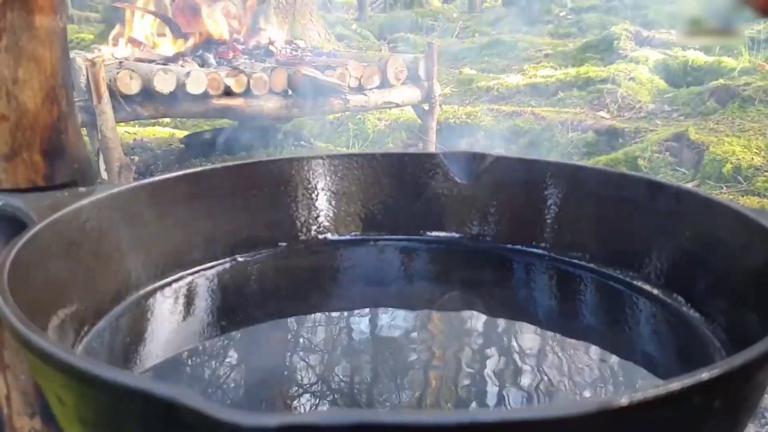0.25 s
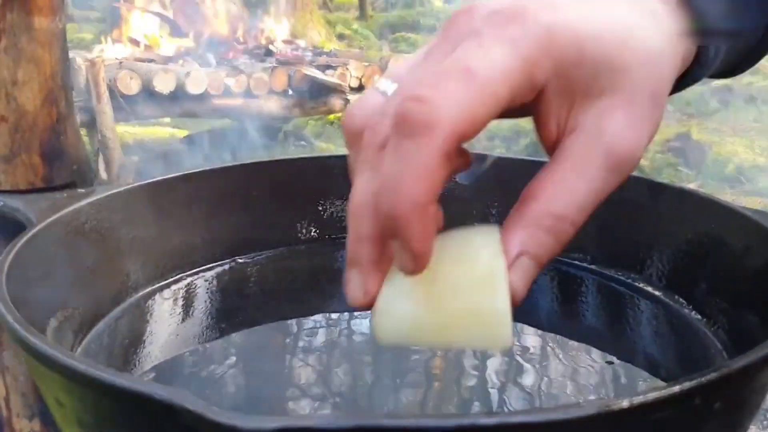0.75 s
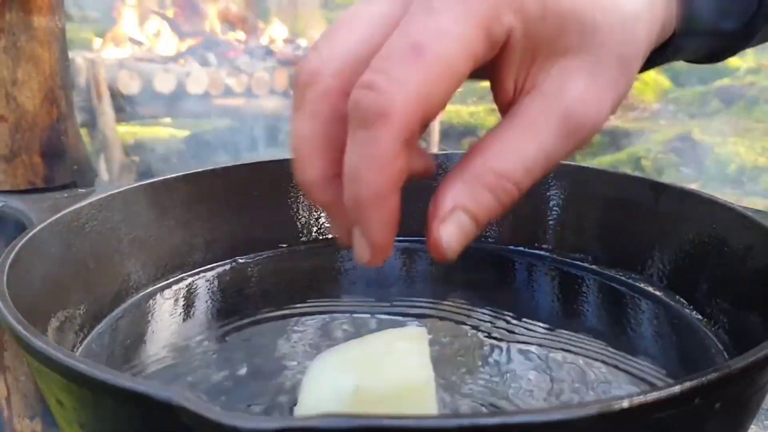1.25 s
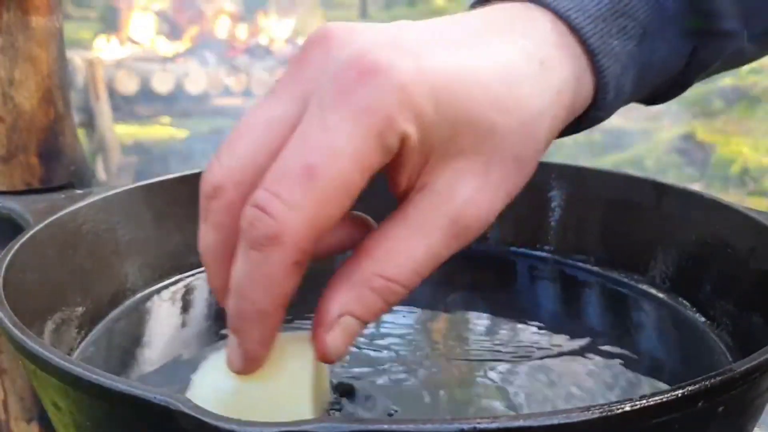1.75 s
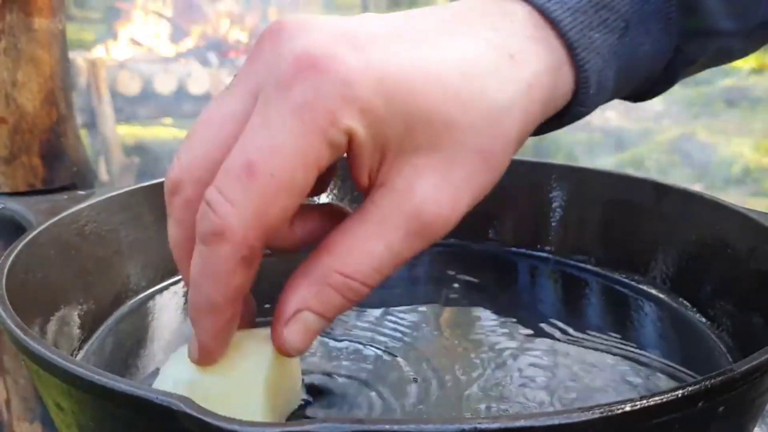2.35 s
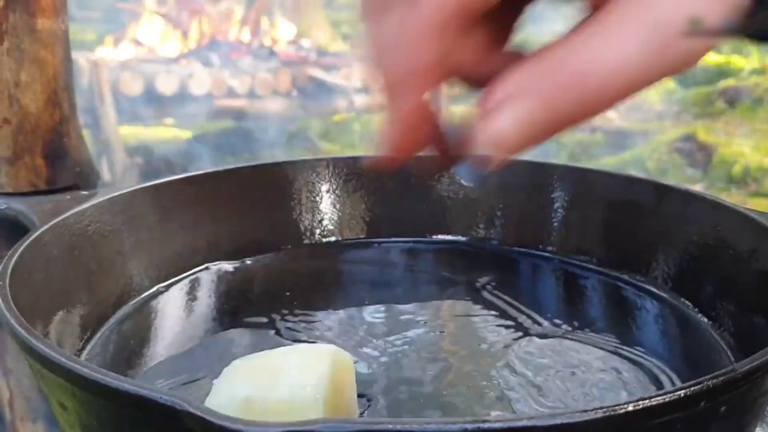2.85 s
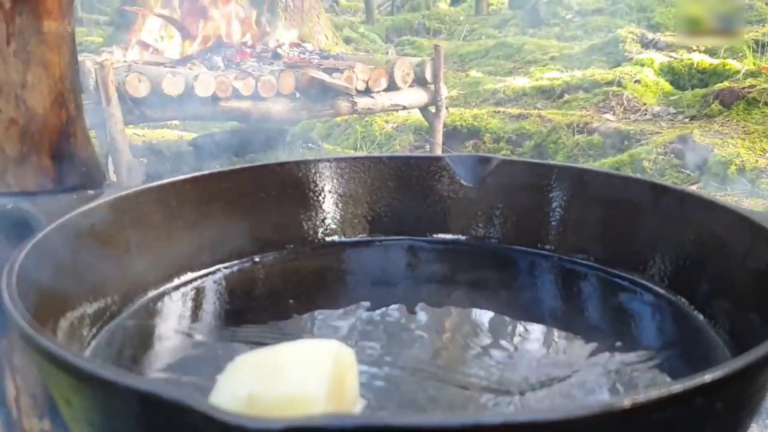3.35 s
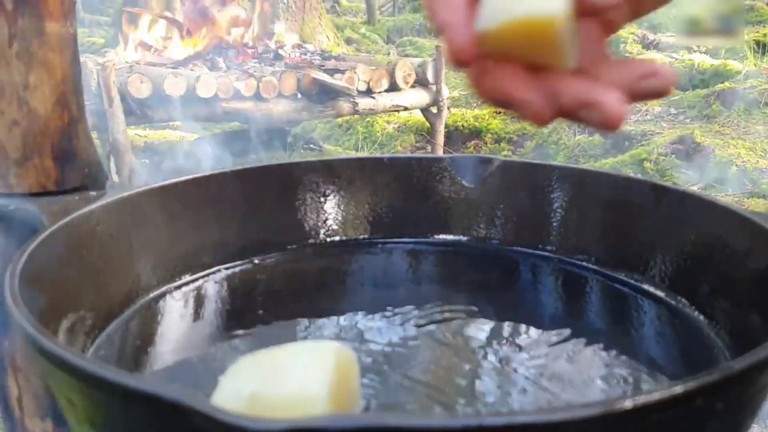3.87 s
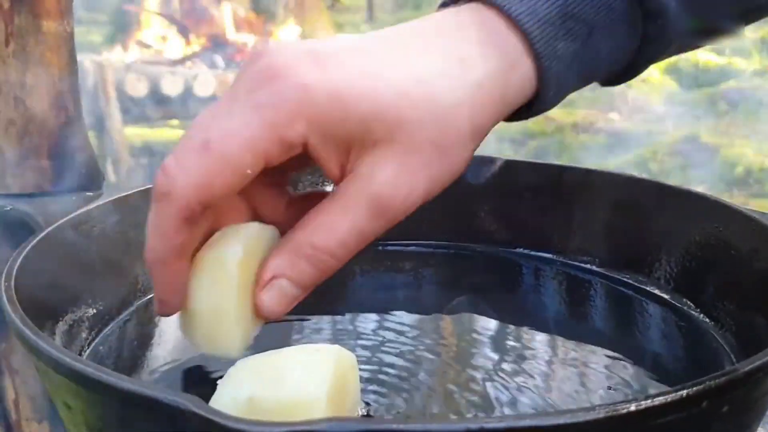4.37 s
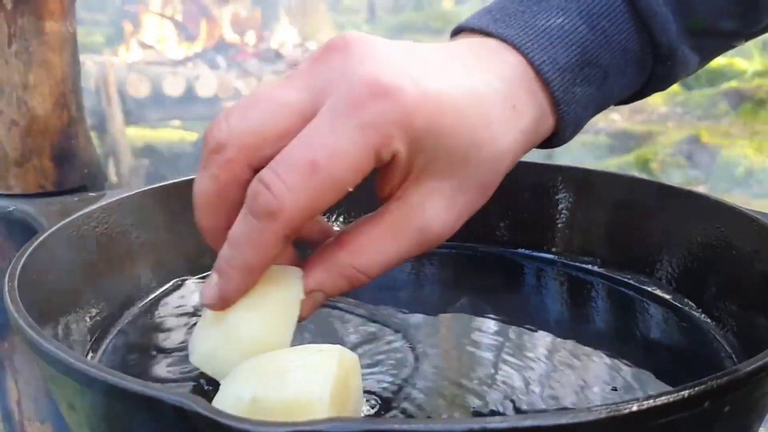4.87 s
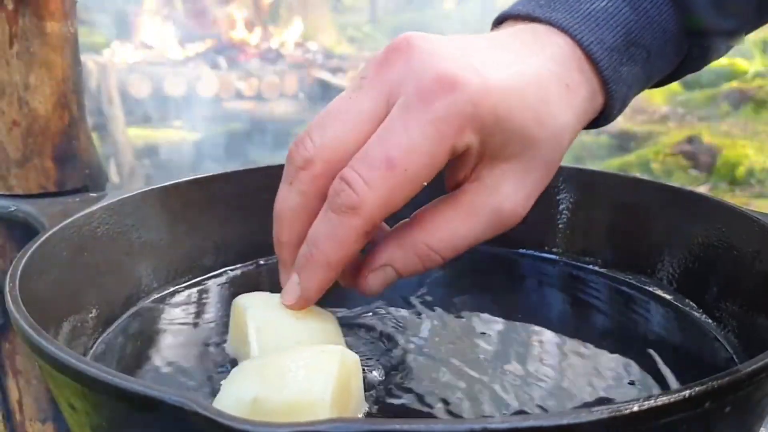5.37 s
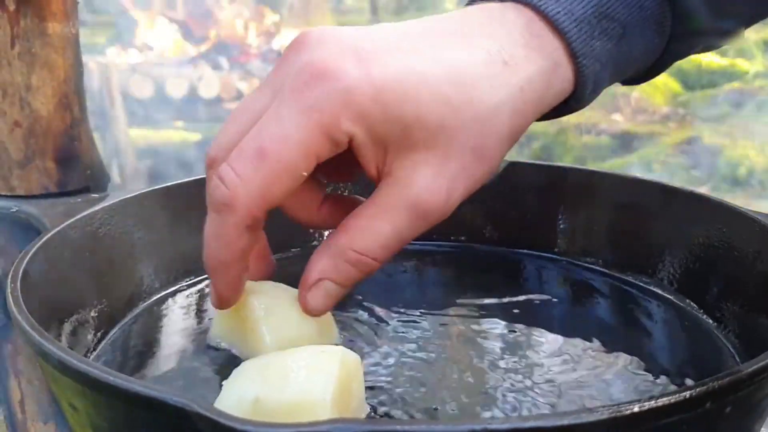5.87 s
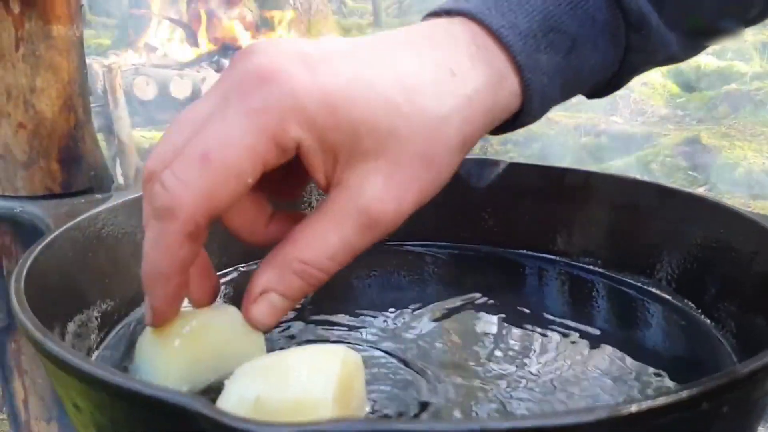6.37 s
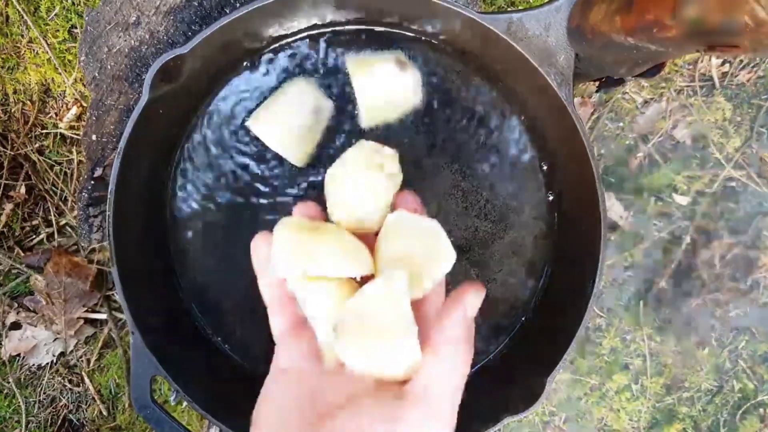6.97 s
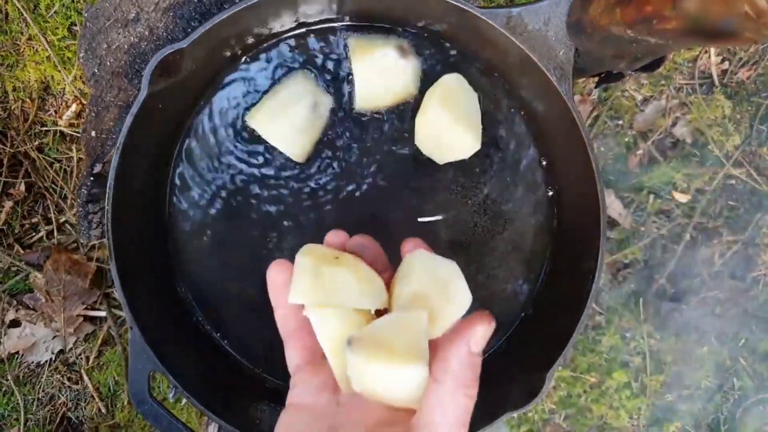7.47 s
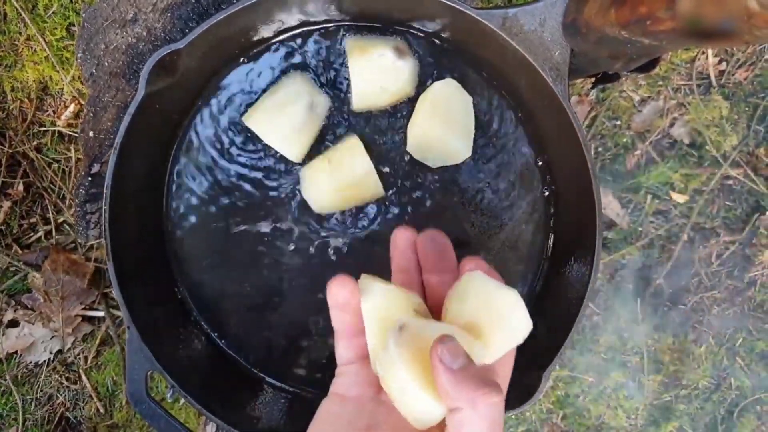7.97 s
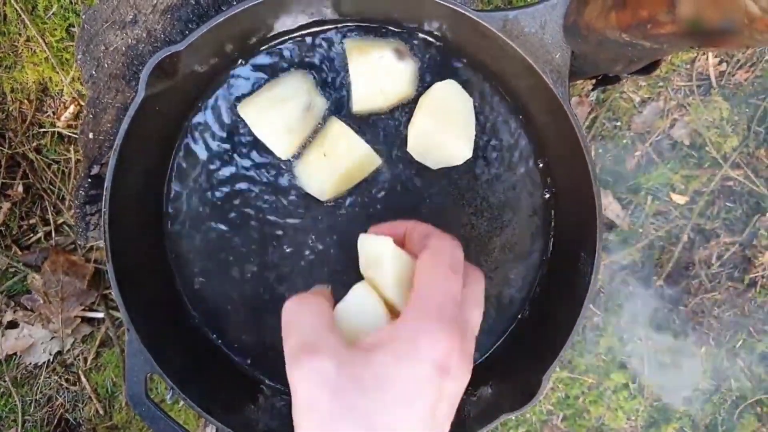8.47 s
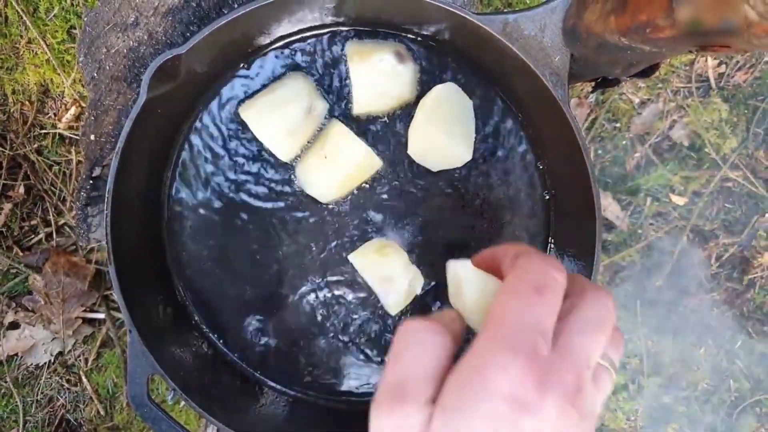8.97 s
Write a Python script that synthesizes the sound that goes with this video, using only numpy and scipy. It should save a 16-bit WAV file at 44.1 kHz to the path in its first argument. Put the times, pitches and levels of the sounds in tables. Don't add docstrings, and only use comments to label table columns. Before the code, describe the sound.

Close, dry outdoor frying in a cast-iron pan, with a faint lumpy fire rumble below. It starts almost silent, with thin fizz; a sharp pop at 0.8 s, then a short flare of hiss at 1.1 s as the first potato piece meets the fat, the iron humming faintly. Light bright spits scatter from 1.0 to 1.8 s, a high snap at 3.0 s, sparse ticks over soft sizzle, and small hissing flares at 4.7-5.4 s. The loudest crack bursts at 5.9 s. At 6.7 s the perspective moves above the pan; from 7 s the fizz is stronger, with frequent pitched plops, tiny iron pings and soft bumps. At 8.0-8.6 s the sizzle swells, with a crisp spit at 8.4 s and a blunt, hard knock at 8.53 s as a piece falls flat. From 8.9 s a fierce, bright, dense sizzle takes over until the end, around 9.2 s.

```python
import sys
import numpy as np
from scipy import signal
from scipy.fft import rfft, irfft, next_fast_len
from scipy.io import wavfile
from scipy.ndimage import uniform_filter1d

SR = 44100
rng = np.random.default_rng(int(sys.argv[2]) if len(sys.argv) > 2 else 0)


def wav_record(signal):
    frames = np.transpose(np.atleast_2d(signal))
    bounded = np.clip(frames, -1, 1)
    quanta = np.round(bounded * 32767).astype(np.int16)
    wavfile.write(sys.argv[1], SR, quanta)


def boost_factor(decibels):
    exponent = np.asarray(decibels, float) / 20
    return 10 ** exponent


N = 406602
CUT_S = 6.7


def evened(x):
    return x / np.sqrt(np.mean(x ** 2) + 1e-20)


def read(points, hz):
    f, value = np.transpose(points)
    return np.interp(np.log(hz + 1), np.log(f + 1), value)


def curve(rows):
    s, *columns = np.transpose(rows)
    return [np.interp(np.arange(N) / SR, s, c, c[0], c[-1]) for c in columns]


def add(mix, s, sound):
    part = mix[..., round(s * SR):][..., :sound.shape[-1]]
    part += sound[..., :part.shape[-1]]


def shaped(x, gain):
    size = next_fast_len(x.shape[-1] + 4096)
    spectrum = rfft(x, size) * gain(np.fft.rfftfreq(size, 1 / SR))
    return irfft(spectrum, size)[..., :x.shape[-1]]


def band(x, lo_hz, hi_hz):
    return shaped(x, lambda f: 1 / np.sqrt((1 + (lo_hz / (f + 1)) ** 8) * (1 + (f / hi_hz) ** 8)))


def drift(rate_hz):
    span = int(SR / 16 / rate_hz)
    coarse = rng.standard_normal(N // 16 + 1)
    coarse = uniform_filter1d(uniform_filter1d(coarse, span), span)
    return np.repeat(evened(coarse), 16)[:N]


def swells(rows, rise_s, sag_db, fall_db):
    start, hold, db = np.transpose(rows)[:, :, None]
    t = np.arange(0, N + 64, 32) / SR
    u = np.maximum(t - start, 0)
    after = np.maximum(u - rise_s - hold, 0)
    shape = np.minimum(u / rise_s, 1) * boost_factor(db - sag_db * u - fall_db * after)
    return np.interp(np.arange(N) / SR, t, (shape ** 2).sum(0))


def mode(hz, width):
    t = np.arange(4000) / SR
    ring = np.exp(-np.pi * max(width, 10) * t) * np.sin(2 * np.pi * hz * t)
    return ring / np.linalg.norm(ring)


# time in [s], fizz level in [dB], coarseness (hiss against fizz) in [dB].
SIMMER = [(0.0, -82.5, 0), (0.175, -85.5, -3), (0.29, -72, -5), (0.52, -73.5, -13.5), (0.94, -70.5, 1),
          (1.05, -74, -3), (1.35, -68, 9), (2.3, -65.5, 6), (3.1, -67.5, -1.5), (4.1, -69.5, -0.5),
          (4.6, -69.5, -2.5), (5.8, -63.5, 2.5), (6.4, -68, 5), (6.8, -67.5, 3.5), (7.0, -58, 5.5),
          (7.9, -59, 9.5), (8.1, -51.5, 5), (9.22, -37, 6)]
# start in [s], hold in [s], level in [dB], coarseness in [dB], splutter against fizz in [dB].
FLARES = [(1.068, 0.16, -59, 4, -12), (1.45, 0.032, -63, -4, -22), (1.652, 0.016, -53, -4.5, -8),
          (1.84, .04, -69, 8.5, 2), (1.998, 0.3, -68.5, 3, -5), (2.68, 0.14, -67, -3.5, -6.5),
          (3.948, 0.026, -75.5, 4, -1), (4.742, 0.15, -63, 2, -13), (4.907, 0.13, -56.5, -13, -22),
          (5.055, 0.32, -68, 1, -7), (5.44, 0.13, -68, 9, -10), (5.906, 0.11, -65, 3.5, -5),
          (6.444, 0.044, -69.5, 1, -14), (6.985, .03, -67.5, -18, 3), (7.161, 0.018, -65.5, 8, 9),
          (7.304, .08, -68.5, 5.5, -12), (7.544, 0.087, -62.5, -13, 1.5), (7.95, 0.026, -57.5, -1, -16),
          (8.009, .05, -45, -22, -19), (8.086, 0.52, -47, 4.5, -8.5), (8.762, 0.057, -49, -1, -14),
          (8.877, 0.28, -31.5, -9.5, -22)]


def frying():
    level_db, coarse_db = curve(SIMMER)
    hiss_db = level_db - 11 + coarse_db
    splutter_db = level_db - 10.5 + 0.41 * coarse_db - 0.35 * (level_db + 65)
    start, hold, db, coarse, splutter = np.transpose(FLARES)
    flares = [swells(np.transpose([start, hold, db + offset]), rise_s=0.021, sag_db=5, fall_db=160)
              for offset in (0, coarse, splutter)]
    dense_db, sparse_db = -36, -52
    flare_db = 10 * np.log10(flares[0] + 1e-12)
    sparse = np.clip((flare_db - dense_db) / (sparse_db - dense_db), .15, 1)
    flutter = boost_factor(2 * 2.0 * drift(40) * sparse)
    gains = [np.sqrt(boost_factor(2 * calm_db) + flutter * flare)
             for calm_db, flare in zip((level_db, hiss_db, splutter_db), flares)]
    crackle_gain = sparse * np.sqrt(flares[0] + 0.14 * boost_factor(2 * level_db))
    return gains + [crackle_gain]


def bubbles(per_s, spread_db, cycles, clump_db):
    burst = rng.random(N) < per_s / SR * boost_factor(clump_db * drift(60))
    size = boost_factor(spread_db * np.minimum(rng.exponential(1, N), 5)) * burst
    kind, out = rng.integers(0, 24, N), np.zeros(N)
    for k, hz in enumerate(np.geomspace(800, 15000, 24)):
        u = np.arange(900) / SR * hz / cycles
        ring = hz * u * np.exp(-3 * u) * np.sin(2 * np.pi * cycles * u * (1 + 0.059 * u))
        out += signal.oaconvolve(size * (kind == k), ring)[:N]
    return evened(out)


def blotchy(x, patch_db):
    z = signal.stft(x, nperseg=256)[2]
    patches = uniform_filter1d(rng.standard_normal(z.shape), size=7, axis=0)
    patches = uniform_filter1d(patches, size=8, axis=1)
    return signal.istft(z * boost_factor(patch_db * evened(patches)), nperseg=256)[1][:N]


# pitch in [Hz], width in [Hz], level in [dB].
IRON = [(937, 13, -2.5), (1448, 38, 0), (2084, 24, -2), (2520, 9.2, -3.5), (3800, 6.2, 3), (4830, 22, -3.5),
        (5690, 39, -0.5)]


def iron(x):
    ring = sum(boost_factor(db) * mode(hz, width) for hz, width, db in IRON)
    return signal.oaconvolve(x, ring)[:N]


def crackles():
    snap = rng.random(N) < 70 / SR
    size = boost_factor(5.5 * np.minimum(rng.exponential(1, N), 4)) * snap
    snaps = signal.lfilter([1], [1, -.97], size) * rng.standard_normal(N)
    return boost_factor(-13) * evened(band(snaps, 2040, 13000))


# frequency in [Hz], density in [dB per Hz].
FAT = [(350, -10), (600, -2.5), (798, -13), (1220, -12.5), (1570, -9.5), (1730, -12.5), (2240, -10),
       (3460, -12), (4660, -9.5), (5720, -10), (8590, -16), (10800, -7.5), (15400, -14)]


def sizzle():
    fizz_gain, hiss_gain, splutter_gain, crackle_gain = frying()
    steam = rng.standard_normal(N) * boost_factor(.6 * drift(70))
    fierce = np.clip((20 * np.log10(fizz_gain) + 80) / 40, .3, .8)
    crowd = bubbles(per_s=6000, spread_db=3.6, cycles=13.0, clump_db=1.2)
    fat = blotchy(np.sqrt(1 - .6 * fierce ** 2) * steam + fierce * crowd, patch_db=1.5)
    fat = fat + boost_factor(-24) * iron(fat)
    fat = shaped(fat, lambda f: boost_factor(read(FAT, np.minimum(f, 15400))) / (1 + (f / 15600) ** 90))
    fizz = evened(band(fat, 7000, 20000))
    hiss = evened(band(fat, 3000, 7000))
    splutter = evened(band(fat, 700, 3000))
    return fizz_gain * fizz + crackle_gain * crackles() + hiss_gain * hiss + splutter_gain * splutter


# frequency in [Hz], density in [dB per Hz].
FIRE = [(13, -48), (22, -15.5), (59, -3.5), (97, -3.5), (211, -18.5), (372, -9.5), (502, -11.5), (609, -12),
        (982, -23), (1500, -21), (1950, -41), (3300, -120)]
# start in [s], hold in [s], level in [dB].
GUSTS = [
    (2.35, 0.099, -67),
    (3.9, 0.034, -70),
    (8.45, 0.44, -74),
]


def fire():
    rumble_db = 10 * np.log10(boost_factor(2 * -73) + swells(GUSTS, rise_s=0.03, sag_db=0, fall_db=100))
    stirred = np.clip((np.arange(N) / SR - 8.13) / .1, 0, 1)
    a, b = shaped(rng.standard_normal((2, N)), lambda f: boost_factor(read(FIRE, f)) * (f < 2500))
    both = np.array([a, .65 * a + .42 * b])
    low = band(both, 15, 230)
    air = evened(both - low)
    air = (1 - stirred) * boost_factor(-81) * air + stirred * boost_factor(-68) * band(air, 340, 3000)
    lumps_db = 1.5 * drift(8) + 1.5 * drift(25)
    return 0.9 * evened(low) * boost_factor(rumble_db + lumps_db) + 0.92 * air


# time in [s], peak in [dB], bubble pitch in [Hz], low part in [dB], bright part in [dB].
POPS = [
    (0.8316, -21, 1500, -10.5, -1.5),
    (2.981, -21, 11900, -17, -5.5),
    (5.8569, -4.5, 1690, -16.5, -1),
    (8.1055, -24, 4200, -8.5, -3),
]
# time in [s], peak in [dB], bubble pitch in [Hz],
# bright part in [dB].
TICKS = [(1.0458, -41, 14900, -10), (1.1216, -24, 5830, 10), (1.2128, -36, 10700, -3),
         (1.2409, -26, 5700, -21), (1.2843, -27.5, 5700, 0), (1.3233, -28.5, 10300, -8),
         (1.42, -32, 6160, 2), (1.4637, -32, 10700, -14), (1.5412, -27.5, 11200, -18),
         (1.6645, -28, 10800, -3), (1.7074, -38, 10600, -5), (1.7198, -21, 10800, 9),
         (1.782, -30, 9350, -15), (1.8416, -31, 13800, -20), (2.3787, -45, 14800, 1),
         (2.759, -33, 6750, -33), (2.96, -42, 11600, 10), (3.1868, -46, 14200, -6),
         (3.6388, -28, 11000, -31), (3.976, -42, 4000, -44), (4.279, -36.5, 12700, -14),
         (4.499, -28, 10900, -24), (5.0359, -24, 11200, -23), (5.1213, -33.5, 10800, -14),
         (5.49, -29.5, 5560, -20), (5.5711, -29, 5300, -22), (6.14, -31.5, 1940, -8),
         (6.32, -38.5, 5000, -6), (6.517, -32.5, 10800, -30), (6.8205, -37, 10700, -30)]
# time in [s], peak in [dB], bubble pitch in [Hz],
# breadth in [dB] (how much slap and hiss join the pitch).
PLOPS = [(6.9924, -32.5, 890, -33), (7.0088, -27.5, 1410, -11), (7.0662, -36.5, 1000, -27),
         (7.1016, -27, 3000, -16), (7.093, -22, 2640, -27), (7.1931, -29, 6210, -2),
         (7.2092, -24.5, 4130, -24), (7.3025, -30, 5740, -25), (7.3755, -38, 4800, -15),
         (7.4628, -27, 5640, -23), (7.4764, -24.5, 6340, -28), (7.5309, -29.5, 2670, -27),
         (7.5652, -23, 2530, -27), (7.6249, -24.5, 2520, -13), (7.6755, -33, 4100, -26),
         (7.8427, -32.5, 11400, -10), (7.941, -27, 4360, -27), (7.9506, -24.5, 4250, -23),
         (7.9839, -28, 6410, -19), (8.0759, -21, 6040, -7.5), (8.249, -40, 4830, -15),
         (8.2874, -21.5, 2500, -22), (8.339, -31, 2470, -7), (8.357, -27, 4800, -15),
         (8.401, -17.5, 5370, -16), (8.7013, -41, 9720, -27), (8.769, -21, 1790, -19),
         (8.807, -27, 4920, -25), (9.091, -25, 9950, -23), (9.148, -19.5, 2730, -23)]
# time in [s], peak in [dB], pitch in [Hz], low part in [dB],
# bright part in [dB].
DROP = [
    (8.5303, -13, 900, -12, -40),
]


def spit_rows():
    ticks = [(s, db, hz, -37.5, high_db, 0.015) for s, db, hz, high_db in TICKS]
    plops = [(s, db, hz, wide_db - 3.5, wide_db + 1.5, 0.012) for s, db, hz, wide_db in PLOPS]
    pops = [(*row, 0.022) for row in POPS]
    drop = [(*row, .005) for row in DROP]
    return ticks + plops + pops + drop


def spits():
    out, t = np.zeros(N), np.arange(3000) / SR
    rows = spit_rows()
    noise = rng.standard_normal((len(rows), len(t)))
    lead = 40
    for (s, db, hz, low_db, high_db, t60), spray in zip(rows, noise):
        crack = 4.46 * (t == 0)
        burst = np.roll(spray * boost_factor(-60 * t / np.clip(1.27 * t60, .004, .2)) + crack, lead)
        treble = band(burst, 3500, 16300)
        bright = shaped(treble, lambda f: boost_factor(.5 * read(FAT, np.minimum(f, 15400)) - 0.5))
        pitched = 1.6 * band(burst, .8 * hz, 1.22 * hz)
        slap = band(burst, 390, 2610)
        sound = pitched + boost_factor(high_db + 17) * bright + boost_factor(low_db + 22.0) * slap
        thump = boost_factor(low_db - 16.5) * np.sin(2 * np.pi * 120 * t) * boost_factor(-60 * t / 0.032)
        add(out, s + .0006 - lead / SR, boost_factor(db) * (sound / abs(sound).max() + thump))
    return out


def woods(x):
    t = np.arange(12000) / SR
    near, far = rng.standard_normal((2, len(t))) * (t > .002)
    tail = band(near, 250, 7800) * boost_factor(-60 * t / 0.19)
    tail = tail + band(far, 1900, 14400) * boost_factor(-60 * t / 0.26)
    return signal.oaconvolve(x, tail / np.linalg.norm(tail))[:N]


# pitch in [Hz], width in [Hz], steady share in [0 to 1].
HUM_MODES = [(912, 12, .85), (1362, 14, .85), (2050, 45, .65), (1950, 300, 0)]
# start in [s], hold in [s], level in [dB].
DRUM_LOW = [
    (1.068, 0.074, -63),
    (1.664, 0.19, -70),
    (2.293, 0.027, -72),
]
DRUM_MID = [(1.061, 0.12, -62.5), (1.19, .36, -72), (1.66, 0.19, -72.5), (2.29, 0.16, -76),
            (2.68, 0.14, -78.5), (4.73, .3, -81), (5.1, .7, -75), (5.95, 0.085, -67.5)]
DRUM_HIGH = [(1.07, 0.34, -66), (1.66, 0.52, -70), (3.35, 0.16, -76.5), (4.02, 0.87, -82.5),
             (4.74, 0.53, -74), (5.1, 0.63, -68)]
DRUM_LOOSE = [
    (5.95, 0.24, -65.5),
    (6.42, 0.1, -67),
]


def hum():
    out = np.zeros(N)
    for rows, (hz, width, steady) in zip((DRUM_LOW, DRUM_MID, DRUM_HIGH, DRUM_LOOSE), HUM_MODES):
        phase = 2 * np.pi * np.cumsum(hz + width * drift(150)) / SR
        tone = np.sqrt(2) * np.sin(phase)
        shaken = signal.oaconvolve(rng.standard_normal(N), mode(hz, width))[:N]
        level = np.sqrt(swells(rows, rise_s=0.01, sag_db=3, fall_db=183)) * boost_factor(2.4 * drift(70))
        out += level * (steady * tone + np.sqrt(1 - steady ** 2) * shaken)
    return out


# time in [s], level in [dB], pitch in [Hz], t60 in [s].
PINGS = [(3.976, -53, 4153, 0.13), (3.977, -54, 4440, 0.17), (8.245, -32.5, 4830, 0.14),
         (7.096, -42, 2990, 0.14), (7.209, -42.5, 4170, 0.15), (7.21, -44, 3670, 0.24),
         (7.375, -45.5, 4870, .05), (7.568, -52, 2110, 0.6), (7.566, -31, 2650, 0.03),
         (7.569, -45, 4160, 0.068), (8.289, -38, 2600, 0.07), (8.344, -39.5, 2540, 0.094),
         (8.357, -40.5, 1414, 0.095), (9.148, -27, 2660, 0.045)]


def pings():
    out, t = np.zeros(N), np.arange(12000) / SR
    for s, db, hz, t60 in PINGS:
        pair = np.sin(2 * np.pi * hz * t) + 0.32 * np.sin(2 * np.pi * (hz + 18) * t)
        swell = 1 - np.exp(-t / 0.00078)
        add(out, s, boost_factor(db - 60 * t / max(t60, .05)) * swell * pair)
    return out


# time in [s], peak in [dB], pitch in [Hz].
KNOCKS = [(6.992, -51.5, 489), (7.18, -48, 497), (7.786, -57, 458), (7.945, -44.5, 490), (8.01, -45.5, 496),
          (8.052, -47, 480), (8.111, -41.5, 488), (8.287, -50, 485), (8.403, -44.5, 487), (8.531, -14, 503),
          (8.604, -61, 585), (8.768, -51, 585), (8.842, -42.5, 486), (8.896, -52.5, 484), (8.953, -53, 604),
          (9.05, -45.5, 490), (9.144, -54, 605)]


def knocks():
    out, t = np.zeros(N), np.arange(4000) / SR
    for s, db, hz in KNOCKS:
        t60 = .02 if db > -25 else .075
        swell = 1 - np.exp(-t / 0.0013)
        add(out, s, boost_factor(db - 60 * t / t60) * swell * 1.76 * np.sin(2 * np.pi * hz * t))
    return out


# frequency in [Hz], level in [dB].
TILT = [
    [(60, 1.4), (150, 3.7), (380, 30), (950, 13), (2380, 9.2), (5980, 9.9), (15000, 7.7)],
    [(60, 1.0), (150, 0.91), (380, 6.3), (950, 9.8), (2380, 4), (5980, 8.2), (15000, 4.9)],
]
# frequency in [Hz], lag in [rad].
LEAD_SIDE = [(0, 0), (950, 0.7), (1210, 1.8), (1460, 1.4), (3450, 3.0), (3700, 4.6), (5600, 6.5),
             (6200, 6.5), (7840, 12.8), (9990, 12.5), (15300, 12.8), (16400, 14.1)]
LEAD_TOP = [(0, 0), (690, 0.2), (2580, -0.1), (3270, 1.2), (4480, 6.8), (5430, 7.7), (6720, 6.2),
            (8350, 12.3), (9040, 12.6), (15300, 12.5), (15700, 12.1), (16400, 13.8)]
# frequency in [Hz], likeness in [0 to 1].
SAME_SIDE = [(300, .95), (1000, .8), (2500, .7), (5000, .6), (7500, .6), (8500, .85), (12000, .8),
             (15000, .55)]
SAME_TOP = [(300, .97), (1000, .8), (2500, .6), (5000, .4), (7500, .45), (8500, .85), (12000, .7),
            (15000, .4)]


def ports(x):
    late = np.arange(N) > CUT_S * SR
    wander = np.cumsum(drift(300)) * 2 * np.pi * 60 / SR
    other = (signal.hilbert(x, next_fast_len(N))[:N] * np.exp(1j * wander)).real
    size = next_fast_len(N + 4096)
    f, out = np.fft.rfftfreq(size, 1 / SR), np.zeros((2, N))
    views = ((~late, LEAD_SIDE, SAME_SIDE, TILT[0]), (late, LEAD_TOP, SAME_TOP, TILT[1]))
    for on, lead, same, tilt in views:
        left = boost_factor(read(tilt, f))
        like = read(same, f) * np.exp(-1j * read(lead, f))
        unlike = np.sqrt(1 - abs(like) ** 2)
        summed = np.sqrt(abs(left + like) ** 2 + unlike ** 2)
        both = np.sqrt((left + 1) * summed) / 2
        here, there = rfft(x * on, size) / both, rfft(other * on, size) / both
        out += irfft(np.array([left * here, like * here + unlike * there]), size)[:, :N]
    return out


def scene():
    spit = spits()
    rung = band(knocks() + pings(), 330, 9000)
    pan = spit + boost_factor(-11.0) * woods(spit) + sizzle() + hum() + rung
    return ports(pan) + fire()


def top_cut(x):
    return signal.sosfilt(signal.butter(12, 16830, fs=SR, output="sos"), x)


def record(dry):
    t = np.arange(N) / SR
    cut_db = -23 * np.clip((t - 8.92) / .03, 0, 1)
    bass = shaped(dry, lambda f: 1 / (1 + (f / 400) ** 16))
    thinned = dry - bass * (1 - boost_factor(cut_db))
    dip_hz, dip_width_hz, dip_db = 3550, 150, -4

    def dip_and_top(f):
        dip = boost_factor(dip_db * np.exp(-((f - dip_hz) / dip_width_hz) ** 2))
        return dip / (1 + (f / 16450) ** 120)

    return top_cut(shaped(thinned, dip_and_top))


dry = scene()
out = record(dry)
wav_record(out)
```